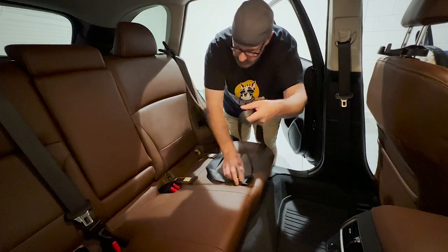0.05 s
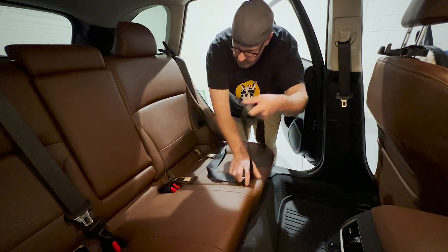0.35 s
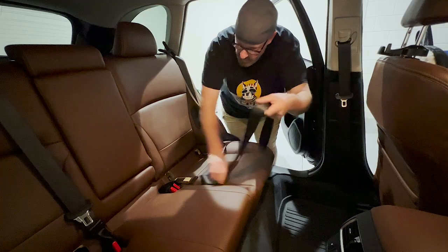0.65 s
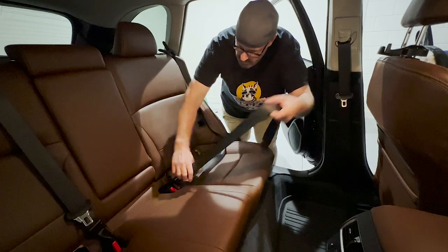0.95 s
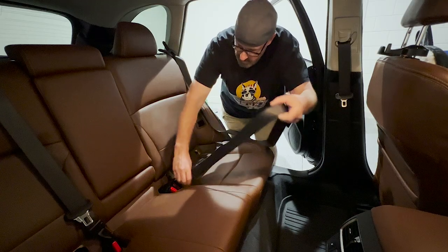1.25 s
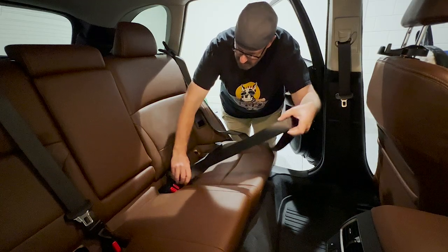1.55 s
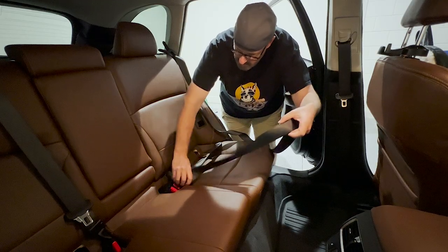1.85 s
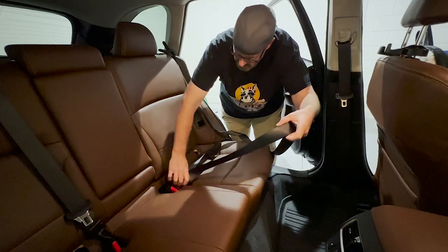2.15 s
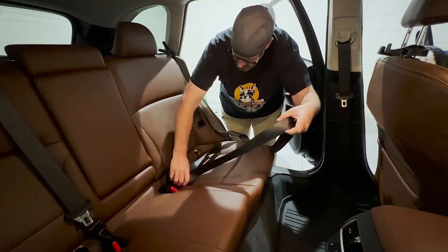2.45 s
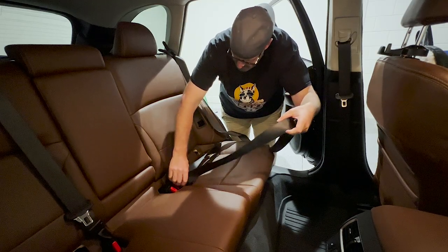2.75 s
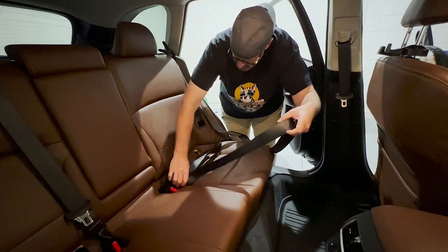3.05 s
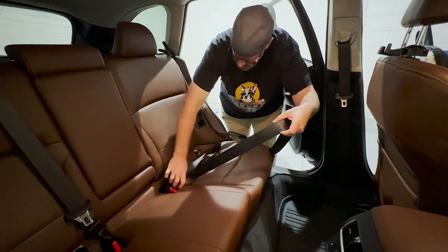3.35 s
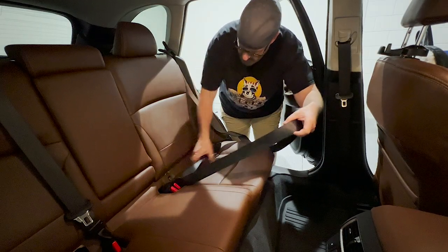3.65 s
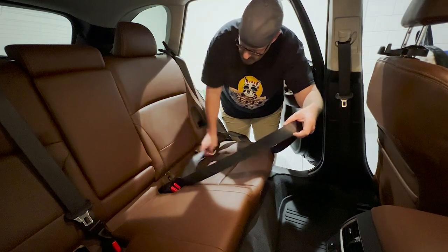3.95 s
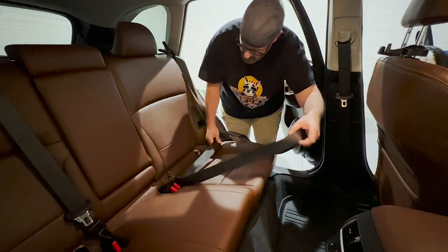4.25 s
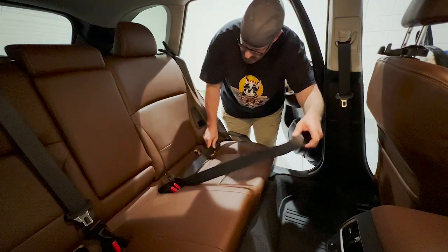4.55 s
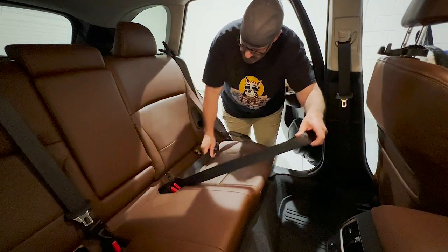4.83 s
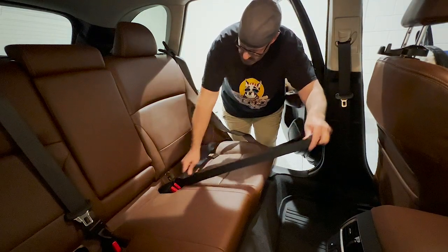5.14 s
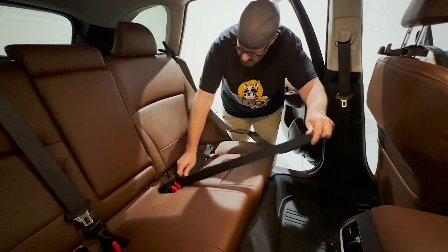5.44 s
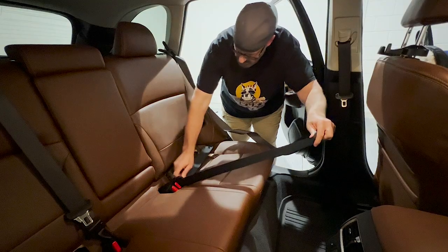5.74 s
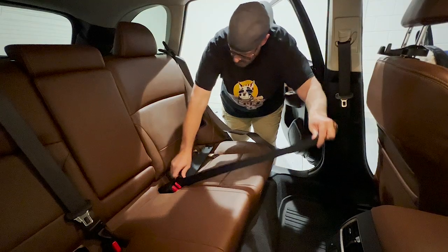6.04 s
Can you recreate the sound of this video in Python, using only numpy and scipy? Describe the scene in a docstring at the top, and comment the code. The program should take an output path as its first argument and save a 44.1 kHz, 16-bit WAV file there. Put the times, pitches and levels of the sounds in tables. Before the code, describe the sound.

A car seat belt buckle taps and clatters, then snaps shut, with webbing sliding softly over leather in a quiet cabin.

```python
"""A seat belt buckle, close to a stereo microphone pair in the back of a car parked in a workshop.
The steel tongue taps and bounces about the plastic shell, and the sprung latch snaps home.
A little to the right, webbing hisses across the leather bench and the reel whirs as it pays out.
Hands bump and press the cushions. Through the open door the hall gives each snap a faint tail,
over a low ventilation hum."""
import sys
import numpy as np
from scipy import signal
from scipy.fft import rfft, irfft
from scipy.io import wavfile
from scipy.ndimage import map_coordinates

SR = 44100
rng = np.random.default_rng(int(sys.argv[2]) if len(sys.argv) > 2 else 0)


def dump_mix(stems):
    """Bounce the given channels to the path in sys.argv[1] as a 16-bit WAV at rate SR."""
    frames = np.atleast_2d(stems).T  # one column per channel
    limited = np.clip(frames, -1, 1)  # hard clip at full scale
    pcm = np.round(limited * 32767).astype(np.int16)
    wavfile.write(sys.argv[1], SR, pcm)


N = 268613
TIME = np.arange(N) / SR


def from_db(db):
    """Decibels to gain."""
    return 10 ** (np.asarray(db) / 20)


def dying(t, t60):
    """Falls by 60 dB in t60 seconds."""
    return from_db(-60 * t / t60)


def onset(t, rise_s):
    """Rises smoothly from zero to one."""
    return 1 - np.exp(-(t / rise_s) ** 2)


def unit_energy(x):
    """Scales each channel to an energy of one."""
    return x / np.sqrt(np.sum(x ** 2, axis=-1, keepdims=True))


def response(points, size=4096):
    """Minimum-phase impulse response for a spectrum of (f/Hz, level/dB) points."""
    hz, db = np.transpose(points)
    grid_hz = np.maximum(np.arange(size // 2 + 1) * SR / size, 1)
    gain = from_db(np.interp(np.log(grid_hz), np.log(hz), db))
    cepstrum = irfft(np.log(gain))
    cepstrum[1:size // 2] *= 2
    cepstrum[size // 2 + 1:] = 0
    return irfft(np.exp(rfft(cepstrum)))


def through(x, impulse):
    """Passes a stereo sound through an impulse response."""
    return signal.oaconvolve(x, np.atleast_2d(impulse), axes=-1)[:, :N]


def colour(x, points):
    """Shapes white sound to a spectrum and keeps its power."""
    return through(x, unit_energy(response(points)))


def low_cut(x, hz, order=3):
    """Rolls off the sound below hz."""
    return signal.sosfilt(signal.butter(order, hz, "high", fs=SR, output="sos"), x)


def noise(alike, size=N):
    """White stereo noise; alike is the share of power common to both sides."""
    common = rng.standard_normal(size)
    return np.sqrt(alike) * common + np.sqrt(1 - alike) * rng.standard_normal((2, size))


def drift(per_s):
    """A smooth random curve with a spread of one."""
    knots = rng.standard_normal(N // 20)
    coarse = TIME[::8]
    curve = np.interp(TIME, coarse, map_coordinates(knots, [coarse * per_s], order=2, mode="mirror"))
    return curve / curve.std()


def band(phase, width_hz):
    """A band of stereo noise around a turning phase."""
    return np.array([drift(width_hz) * np.cos(phase) + drift(width_hz) * np.sin(phase)
                     for side in range(2)])


def add(track, s, sound):
    """Mixes a sound in at time s."""
    start = max(round(s * SR), 0)
    track[:, start:start + sound.shape[-1]] += sound[..., :N - start]


def from_left(x, lag_s):
    """The sound reaches the right microphone later."""
    return np.array([x[0], np.interp(TIME - lag_s, TIME, x[1])])


def mode(t, hz, db, t60):
    """One struck resonance: a dying sine."""
    return from_db(db) * np.sin(2 * np.pi * hz * t) * dying(t, t60)


def stroke(s, half_s, fall_ratio=1.236, squareness=1.7):
    """A movement of the hand swells to its peak at s and fades a little more slowly."""
    near = slice(max(int((s - 5 * half_s) * SR), 0), int((s + 5 * half_s) * SR))
    offset = (TIME[near] - s) / half_s
    away = np.where(offset < 0, -offset, offset / fall_ratio)
    swell = np.zeros(N)
    swell[near] = np.exp(-away ** squareness / 2)
    return swell


def friction(alike, patchy_db=4.2, patches_per_s=55):
    """Rubbing noise: each half octave catches and lets go on its own."""
    rest, rub = noise(alike), 0
    for hz in np.geomspace(500, 8000, 9):
        low = signal.sosfiltfilt(signal.butter(3, hz, fs=SR, output="sos"), rest)
        rub = rub + low * from_db(patchy_db * drift(patches_per_s))
        rest = rest - low
    return (rub + rest) / np.std(rub + rest)


# Room tone of the workshop: f/Hz, level/dB
AIR_SPECTRUM = [(15, -34.5), (25, -10.5), (76, 5.5), (394, -18), (818, -19.5), (1700, -21), (2840, -28.5),
                (7500, -51.5), (16000, -69)]
def background(air_db=-69, hum_hz=57, hum_db=-66, waver_db=1.5):
    """Still air all around the car and a low, wavering ventilation hum."""
    hum_gain = from_db(hum_db + waver_db * drift(17))
    hum = hum_gain * np.sin(2 * np.pi * hum_hz * TIME + 2.0 * drift(3.9))
    return hum + from_db(air_db) * colour(noise(0.19), AIR_SPECTRUM)


# Colour of the hall, heard from inside the car: f/Hz, level/dB
HALL_SPECTRUM = [(60, -8), (250, -3.5), (600, 3.5), (1100, -2.5), (3000, 0.5), (6200, 1.5), (9000, 0),
                 (13000, -13.5), (17000, -13)]
def hall(x, wet_db=-14, t60=0.69, build_s=0.0024):
    """The diffuse tail of the workshop comes back through the open door."""
    t = TIME[:SR * 3 // 2]
    tail = unit_energy(noise(0, len(t)) * dying(t, t60) * onset(t, build_s))
    return from_db(wet_db) * through(through(x, response(HALL_SPECTRUM)), tail)


# Echoes off hard surfaces near the microphones: left delay/s, right delay/s, level/dB
CABIN_ECHOES = [(.00057, .00058, -18), (.00091, .00093, -15), (.00116, .00117, -17), (.00175, .0036, -15),
                (.0052, .0043, -14)]
def cabin(x, lowest_hz=1500):
    """Small hard surfaces return the treble within a few milliseconds and ripple its spectrum."""
    echoes = np.zeros((2, SR // 100))
    for left_s, right_s, db in CABIN_ECHOES:
        echoes[0, round(left_s * SR)] = echoes[1, round(right_s * SR)] = from_db(db)
    return x + through(low_cut(x, lowest_hz, order=1), echoes)


# Soft bumps on the rear bench: t/s, level/dB, f/Hz
CUSHION_BUMPS = [(0.018, -41.5, 53), (0.092, -41, 55), (0.295, -37.5, 71), (0.568, -37.5, 276),
                 (0.598, -36, 94), (1.129, -47, 133), (1.838, -31, 160), (2.181, -35.5, 189),
                 (3.242, -49.5, 176), (3.357, -40, 300), (3.44, -51, 204), (3.714, -41, 155),
                 (4.196, -45.5, 218), (4.247, -47.5, 52.2), (5.692, -48, 156.2), (5.863, -48, 167.4)]
def bumps(tone_db=-2, cycles=13, soft_s=0.0016, thud_db=-9, thud_t60=0.15,
          settle_s=0.028, settle_ratio=0.7, settle_db=-6.5):
    """A bumped cushion rings, then settles lower and softer; returns tones and a thud envelope."""
    tones, thuds = np.zeros((2, 2, N))
    t = TIME[:SR // 2]
    for s, db, hz in CUSHION_BUMPS:
        push = from_db(db) * (1 - np.exp(-t / soft_s))
        add(tones, s, push * mode(t, hz, tone_db, cycles / hz))
        add(tones, s + settle_s, push * mode(t, settle_ratio * hz, tone_db + settle_db, cycles / hz))
        add(thuds, s, push * from_db(thud_db) * dying(t, thud_t60))
    return tones, thuds


# A hand leans on the bench: peak t/s, half length/s, cushion rumble/dB, leather rub/dB
HAND_PRESSES = [(-0.017, 0.051, -67, -61.5), (0.425, 0.026, -55, -57), (0.68, 0.13, -57.5, -77.5),
                (0.995, 0.057, -55, -59.5), (1.253, 0.046, -63, -62), (1.408, 0.097, -56.5, -85),
                (1.955, 0.13, -59, -59.5), (2.272, 0.026, -57, -102.5), (3.159, 0.072, -58.5, -67.5),
                (3.432, 0.089, -52.5, -60.5), (3.725, 0.014, -58.5, -58.5), (3.817, 0.024, -51, -63.5),
                (3.943, 0.029, -50.5, -60.5), (4.296, 0.085, -58, -73), (4.83, 0.046, -59.5, -81.5),
                (5.156, 0.036, -54, -55), (5.3, 0.019, -59, -63.5), (5.55, 0.025, -57.5, -60.5),
                (5.791, 0.21, -61, -83.5)]
# The leather cover and the cushion under it: f/Hz, level/dB
LEATHER_SPECTRUM = [(80, -18.5), (160, 0.5), (240, -1.5), (400, -11), (600, -13.5), (900, -7), (1600, -13),
                    (5000, -36.5)]
CUSHION_SPECTRUM = [(20, -28.5), (35, -0.5), (50, 12.5), (100, 5.5), (140, -6), (220, -11.5), (400, -23.5),
                    (900, -33), (3000, -51.5)]
def seat(rumble_db=-1, leather_db=-2, catch_db=1.5, lowest_hz=45):
    """The cushions thud when bumped; under a leaning hand they rumble and the leather catches."""
    tones, thuds = bumps()
    weight, rub = sum(from_db([[cushion_db], [rub_db]]) * stroke(s, half_s)
                      for s, half_s, cushion_db, rub_db in HAND_PRESSES)
    leather = friction(0.39) * rub * from_db(leather_db + catch_db * np.tanh(drift(70)))
    rumble = noise(0.98) * (thuds + weight * from_db(rumble_db))
    cushions = tones + colour(rumble, CUSHION_SPECTRUM)
    # the slowest movements radiate no sound
    return colour(leather, LEATHER_SPECTRUM) + low_cut(cushions, lowest_hz)


# The belt is pulled off the reel: start t/s, length/s, level/dB
REEL_PULLS = [(0.9, 0.66, -70), (1.62, 0.68, -72.5), (3.86, 0.78, -71.5), (4.805, 0.43, -70),
              (5.096, 0.4, -65), (5.974, 0.53, -70.5)]
def spool(spin_up_s=0.036, run_down_s=0.23):
    """Each pull spins the spool up and lets it run down; returns its speed (0-1) and loudness."""
    speed, loudness = 0, 0
    for s, length_s, db in REEL_PULLS:
        spin_up = 1 - np.exp(-np.maximum(TIME - s, 0) / spin_up_s)
        spin = spin_up * np.clip((s + length_s - TIME) / run_down_s, 0, 1)
        speed = np.maximum(speed, spin)
        loudness = np.maximum(loudness, from_db(db) * spin)
    return speed, loudness


def reel(slow_hz=830, full_hz=1394, wobble=0.014, whir_db=-1.5, width_hz=150,
         rasp_width_hz=600, rasp_db=-3, overtone_ratio=2.7, overtone_db=-11, waver_db=1.8):
    """The reel whirs in a restless band with a rasp and a faint overtone, higher as it spins faster."""
    speed, loudness = spool()
    hz = slow_hz + (full_hz - slow_hz) * np.sqrt(speed)
    phase = 2 * np.pi * np.cumsum(hz * (1 + wobble * drift(25))) / SR
    whir = band(phase, width_hz)
    rasp = from_db(rasp_db) * band(phase, rasp_width_hz)
    overtone = from_db(overtone_db) * band(overtone_ratio * phase, rasp_width_hz)
    uneven_pull = from_db(whir_db + waver_db * drift(22))
    return loudness * uneven_pull * (whir + rasp + overtone)


# The ribs of the weave cross an edge: peak t/s, half length/s, level/dB, f/Hz
WEAVE_NOTES = [(0.915, 0.016, -53.5, 1058), (1.4, 0.019, -69, 4060), (4.213, 0.23, -73, 1129),
               (4.8, 0.041, -68.5, 5750), (4.83, 0.0069, -62.5, 1006), (5.123, 0.02, -59.5, 994)]
def singing_weave(width_share=0.25):
    """Drawn over an edge, the even weave gives a brief, breathy pitch."""
    return sum(from_db(db) * stroke(s, half_s) * band(2 * np.pi * hz * TIME, width_share * hz)
               for s, half_s, db, hz in WEAVE_NOTES)


# Webbing slides through the hand: peak t/s, half length/s, level/dB, zip/dB re slide
BELT_SLIDES = [(0, 0.11, -66.5, -32), (0.306, 0.039, -69.5, -19), (0.416, 0.034, -59.5, -35),
               (0.589, 0.023, -59, -12), (0.688, 0.046, -69, -10), (0.882, 0.046, -58, -9),
               (1.036, 0.03, -63.5, -11), (1.346, 0.15, -75.5, -22), (2.161, 0.0074, -50, 5),
               (2.676, 0.0078, -73.5, -9), (3.149, 0.028, -69, -35), (3.515, 0.043, -65.5, -29),
               (3.818, 0.029, -68, -30), (3.926, 0.012, -62.5, -7), (4, 0.016, -67.5, -7),
               (4.283, 0.017, -65, 0), (4.365, 0.018, -66, 0.5), (4.778, 0.067, -69, -8),
               (4.845, 0.0094, -61.5, 12), (5.135, 0.029, -56.5, -1), (5.457, 0.015, -67.5, -6),
               (5.541, 0.021, -61, -8)]
# The webbing's rub, its slip, and the bright top shared by zip and latch snap: f/Hz, level/dB
RUB_SPECTRUM = [(150, -33.5), (250, -17), (576, -13.5), (740, -1), (1330, -13), (1750, -3.5), (2960, -10.5),
                (6590, -6), (8700, -9), (10700, -19.5), (13000, -21), (16000, -35)]
SLIP_SPECTRUM = [(400, -8), (900, 4.5), (2500, -6), (5000, -2.5), (8000, -1.5), (10500, -17),
                 (12200, -31.5), (14000, -21.5), (17000, -18)]
BRIGHT_SPECTRUM = [(3000, -55.5), (8000, -7.5), (10200, -18), (11900, -4.5), (12800, -15.5), (13700, -23),
                   (15400, -14.5), (17000, -13.5)]
def belt(grain_db=0.5, slip_db=-7, zip_db=-1, running_db=-4, rustle_db=-87, rustle_swing_db=3):
    """The weave catches and slides in fine grains, brighter where it slips fast through the hand."""
    slides, zips = 0, 0
    for s, half_s, db, bright_db in BELT_SLIDES:
        slide = from_db(db) * stroke(s, half_s)
        slides = slides + slide
        zips = zips + from_db(bright_db + zip_db) * slide
    rustle = from_db(rustle_db + rustle_swing_db * drift(15))  # a held belt never lies quite still
    _, spool_loudness = spool()
    running = from_db(running_db) * spool_loudness
    movement = np.sqrt(slides ** 2 + running ** 2 + rustle ** 2)
    grain = from_db(grain_db * drift(340))
    rub = colour(friction(0.19) * grain * movement, RUB_SPECTRUM)
    slip = colour(friction(0.22) * grain * slides * from_db(slip_db), SLIP_SPECTRUM)
    zipping = colour(noise(0.074) * grain * zips, BRIGHT_SPECTRUM)
    return rub + slip + zipping


def bounces(s, db, tone, gap_s, loss_db, gap_shrink=0.65, loss_power=1.1):
    """Steel touches three times, ever sooner and weaker; yields (t/s, level/dB, tone) for each."""
    for k in range(3):
        yield s, db - k ** loss_power * loss_db, tone
        s += gap_s * gap_shrink ** k


# The tongue taps about the buckle, and the row at 4.8476 s is the sharp tick that sets off a zip of the
# webbing: # t/s, steel level/dB, shell/dB re steel, rim clack/dB re steel, tongue ring/dB re steel, ring centre
# f/Hz, shell centre f/Hz
TONGUE_TAPS = [(0.5682, -50, 24.5, 4, -7, 5300, 870), (.606, -55, 7, 13, 6, 3333, 1000),
               (.8795, -50.5, -50, -14, 15.5, 5400, 1000), (1.0114, -59, 24, 1, -10, 3920, 1180),
               (1.4855, -47, 11.5, -5.5, 8.5, 4330, 945), (1.509, -57.5, -2, -0.5, 6, 4170, 1076),
               (1.6693, -54.5, 10, 4.5, 16.5, 3660, 794), (1.675, -51, 17.5, 4.5, 0, 3700, 850),
               (1.9875, -52, 17, -7.5, -1, 4050, 730), (2.031, -43.5, 13, -26, -15, 5500, 890),
               (2.081, -42.5, 1.5, -12, -4, 4100, 1140), (2.147, -55, 14, 9, 11, 5530, 995),
               (2.363, -65.5, 32.5, -19.5, 6.5, 7100, 1070), (2.552, -52, 12.5, 0, 3, 6030, 1050),
               (2.638, -72, 20.5, 0, -7, 6050, 910), (2.7727, -56.5, 13.5, 4, 11.5, 7040, 1000),
               (2.8505, -67, 24, 8.5, -12, 6750, 980), (2.871, -68.5, 28, 11.5, -11, 4000, 986),
               (3.0216, -59, 24.5, 6.5, 13, 3600, 1054), (3.09, -64, 23, 0, -7.5, 4090, 880),
               (3.1177, -56.5, 17, 8, 3, 3760, 1050), (3.189, -49.5, 12, -3.5, -13.5, 7040, 800),
               (3.197, -41, 12, -5, -2, 7000, 910), (3.349, -32, -6.5, -14, -21.5, 6960, 990),
               (3.369, -36.5, 1.5, -11.5, -24.5, 3550, 1025), (3.4308, -38.5, -39, 8, 12, 7600, 1045),
               (3.508, -53, -11, -6, 15.5, 7100, 1030), (3.708, -51.5, 9, 0, -28, 3980, 730),
               (4.196, -57, 14, 0, -12, 4040, 1260), (4.8476, -57, -14, -17, 5, 8820, 1000),
               (5.73, -56.5, 8, -4, -15, 4050, 800), (5.8605, -59.5, 4.5, 1, 2, 3660, 830),
               (5.975, -58.5, -3, -6.5, -5, 7020, 796)]
def tap_contacts(firm_db=-37, firm_bright_db=-21.5, firm_rise_s=0.0008, gap_s=0.005, ring_share=0.72):
    """The hand-held tongue bounces raggedly and rings short; a lighter tap is duller and rises slower."""
    for s, db, shell_db, _, ring_db, ring_hz, shell_hz in TONGUE_TAPS:
        force_db = db - firm_db
        bright_db = firm_bright_db + 0.91 * force_db
        rise_s = firm_rise_s * from_db(-0.45 * force_db)
        tone = (shell_db, bright_db, shell_hz, ring_db, ring_hz, rise_s, ring_share)
        yield from bounces(s, db, tone, gap_s * rng.uniform(0.6, 1.5), loss_db=7)


# The tongue scrapes along the slot: peak t/s, half length/s, level/dB
RIM_SCRAPES = [(2.761, 0.015, -69.5), (2.98, 0.019, -75.5), (3.15, .022, -67)]
# The plastic rim of the slot: f/Hz, level/dB
RIM_SPECTRUM = [(400, -33.5), (1700, 2), (2400, -4), (7000, -35.5)]
def slot(clack_t60=0.02, grain_db=5, grains_per_s=300):
    """The rim clacks under each tap and scrapes while the tongue feels for the opening."""
    clacks, t = np.zeros((2, N)), TIME[:SR // 10]
    for s, db, _, clack_db, *_ in TONGUE_TAPS:
        add(clacks, s, from_db(db + clack_db) * noise(0.93, len(t)) * dying(t, clack_t60))
    pressure = sum(from_db(db) * stroke(s, half_s) for s, half_s, db in RIM_SCRAPES)
    scrapes = noise(1.0) * pressure * from_db(grain_db * drift(grains_per_s))
    return colour(clacks + scrapes, RIM_SPECTRUM)


# Modes of the buckle's plastic shell: f/Hz, level/dB, t60/s
SHELL_MODES = [(650, 2, .024), (790, -4, .05), (965, -8, .035), (1040, 0, .034), (1120, -6, .028),
               (1210, -8, .04), (1895, -21, .04)]
def shell_knock(t, centre_hz, ring_share, fall_db_per_octave=27):
    """The hollow shell knocks; the point of contact favours the modes near centre_hz."""
    return sum(mode(t, hz, db - fall_db_per_octave * abs(np.log2(hz / centre_hz)), t60 * ring_share)
               for hz, db, t60 in SHELL_MODES)


# Modes of the steel tongue: f/Hz, level/dB
TONGUE_MODES = [(3410, 0), (3568, -6), (3783, -4), (3896, -4), (4197, -2), (4275, -1), (5083, -3),
                (5260, -2), (5539, -2), (5823, -2), (6112, -3), (6329, -1), (6775, 0), (7100, 0),
                (7523, -2), (8820, -7)]
def tongue_ring(t, centre_hz, ring_share, t60=0.03, detune=0.008, fall_db_per_octave=14):
    """The tongue rings most near centre_hz; the fingers damp it and shift its modes at each touch."""
    ringing = 0
    for hz, db in TONGUE_MODES:
        gripped_hz = hz * rng.normal(1, detune)
        struck_db = db - fall_db_per_octave * abs(np.log2(hz / centre_hz)) + rng.uniform(-3, 3)
        ringing = ringing + mode(t, gripped_hz, struck_db, t60 * ring_share)
    return ringing


def clatter(t, crack_t60, scatter_db, scatter_t60):
    """A dense crack of steel on steel, then its scatter about the cabin."""
    crack = noise(0.49, len(t)) * dying(t, crack_t60)
    scatter = noise(0.15, len(t)) * from_db(scatter_db) * dying(t, scatter_t60)
    return crack + scatter


# The latch springs over: t/s, steel level/dB, shell/dB re steel, bright snap/dB re steel,
# shell centre f/Hz, tongue ring/dB re steel, ring centre f/Hz, rise/s, first gap/s, bounce loss/dB
LATCH_SNAPS = [ (1.8195, -22.5, 8, -12, 1121, 5, 5050, 0.0014, .0099, 5.5),
               (3.2303, -28, -26, 0, 797, -0.5, 7580, 0.00051, .005, 19),
               (3.3525, -22.5, 13.5, -3.5, 964, -6.5, 3300, 0.002, .00385, 11.5),
               (3.4351, -34.5, 1.5, 4.5, 1040, 10.5, 7350, 0.001, .0029, 4), ]
def snap_contacts(ring_share=1):
    """The sprung latch rebounds at set gaps and rings for its full time."""
    for s, db, *tone, gap_s, loss_db in LATCH_SNAPS:
        yield from bounces(s, db, (*tone, ring_share), gap_s, loss_db)


# The steel latch, close up: f/Hz, level/dB
LATCH_SPECTRUM = [(150, -28.5), (500, -24.5), (800, -2), (1400, -13.5), (1850, -5.5), (2400, -13),
                  (2900, -3.5), (3420, -7.5), (3850, -4), (4700, -8.5), (5800, -6.5), (7000, -6),
                  (8300, -11.5), (9700, -19), (13000, -36.5), (16000, -36.5)]
def buckle(latch_db=2.5, snap_db=1, shell_db=1, tongue_db=-5, pad_db=-22, pad_t60=0.13,
           steel_lag_s=0.00009, plastic_lag_s=0.00023):
    """Every contact shakes latch, tongue and shell; returns the knocks and the tongue's ring."""
    latch, snap, shell, tongue, pad = np.zeros((5, 2, N))
    t = TIME[:SR // 10]
    for contacts in (snap_contacts(), tap_contacts()):
        for s, db, tone in contacts:
            hollow_db, bright_db, shell_hz, ring_db, ring_hz, rise_s, ring_share = tone
            blow = from_db(db) * onset(t, rise_s)
            crack = clatter(t, 0.017 * ring_share, scatter_db=-9, scatter_t60=0.07 * ring_share)
            bright_crack = clatter(t, 0.017, scatter_db=-8, scatter_t60=0.074)
            add(latch, s, blow * from_db(latch_db) * crack)
            add(snap, s, blow * from_db(bright_db + snap_db) * bright_crack)
            add(shell, s, blow * from_db(hollow_db + shell_db) * shell_knock(t, shell_hz, ring_share))
            add(tongue, s, blow * from_db(ring_db + tongue_db) * tongue_ring(t, ring_hz, ring_share))
            # the buckle is nudged against the leather under it
            add(pad, s, blow * from_db(pad_db) * noise(0.95, len(t)) * dying(t, pad_t60))
    steel = colour(latch, LATCH_SPECTRUM) + colour(snap, BRIGHT_SPECTRUM)
    plastic = low_cut(shell, hz=600) + slot()  # the small shell radiates poorly below its lowest mode
    knocks = from_left(steel, steel_lag_s) + from_left(plastic, plastic_lag_s)
    return knocks + colour(pad, LEATHER_SPECTRUM), from_left(tongue, steel_lag_s)


def scene(belt_pan_db=1.22, ring_to_hall_db=-8):
    """The rear bench from close by, the belt to the right of the buckle, the workshop beyond the door."""
    knocks, ringing = buckle()
    to_right = from_db([[-belt_pan_db], [belt_pan_db]])
    near = knocks + seat() + (belt() + singing_weave() + reel()) * to_right
    # little of the tongue's ring gets past the hand and out of the door
    escaping = near + from_db(ring_to_hall_db) * ringing
    return cabin(near + ringing) + hall(escaping) + background()


# Balance of the microphone pair: f/Hz, left minus right level/dB
MIC_BALANCE = [(40, 2.3), (90, 3.4), (180, 6.5), (350, 8), (750, 4), (1200, 7.5), (2400, 3), (4400, 13),
               (7200, 11.5), (9700, 2), (14000, 0)]
def record(dry, cutoff_hz=16100):
    """The left microphone faces the buckle, the right is shaded; the top treble is cut."""
    sides = [response([(hz, sign * db / 2) for hz, db in MIC_BALANCE]) for sign in (1, -1)]
    top_cut = signal.ellip(10, 0.2, 80, cutoff_hz, fs=SR, output="sos")
    return signal.sosfilt(top_cut, through(dry, sides))


dry = scene()
out = record(dry)
dump_mix(out)
```